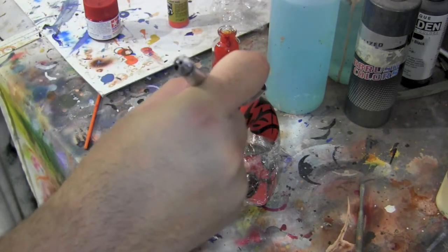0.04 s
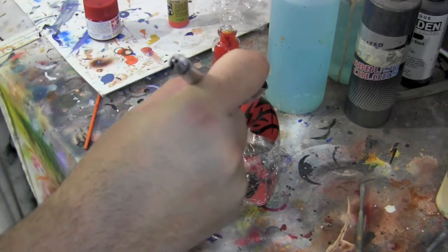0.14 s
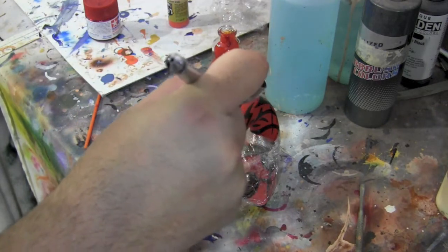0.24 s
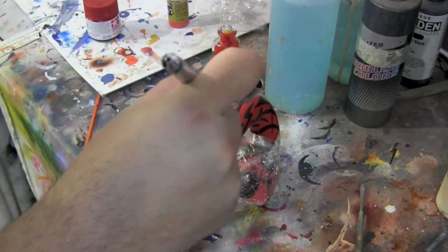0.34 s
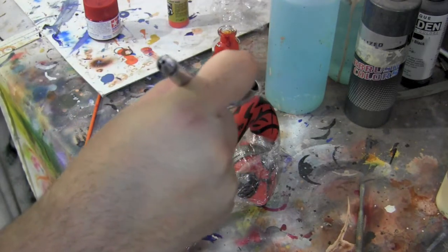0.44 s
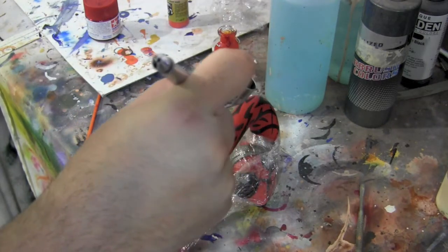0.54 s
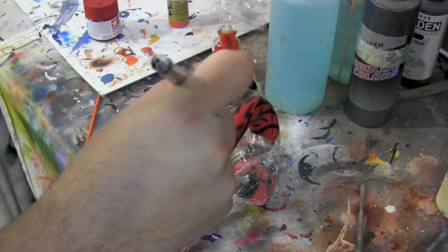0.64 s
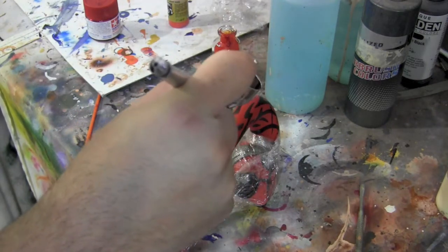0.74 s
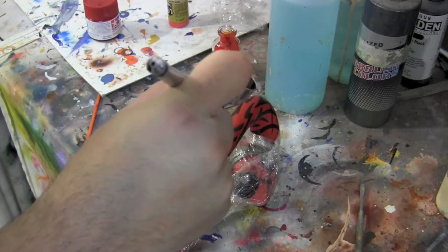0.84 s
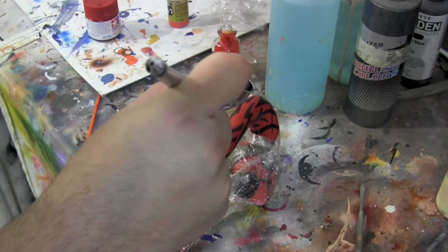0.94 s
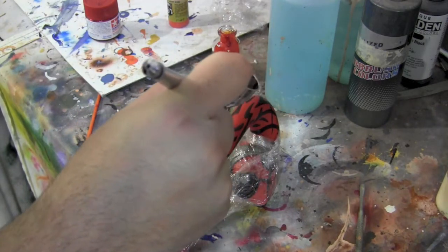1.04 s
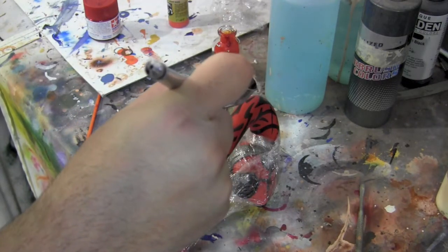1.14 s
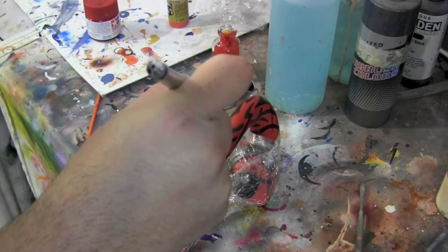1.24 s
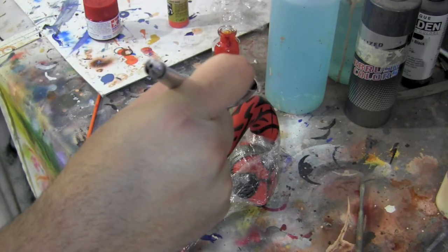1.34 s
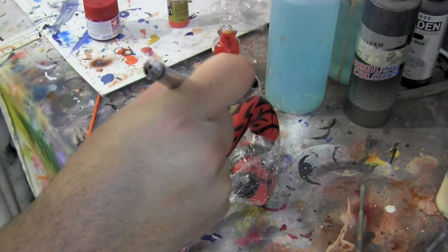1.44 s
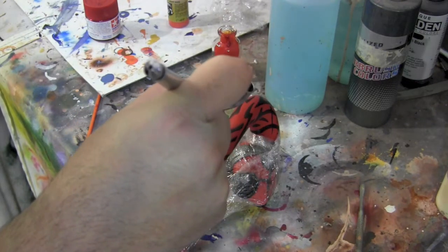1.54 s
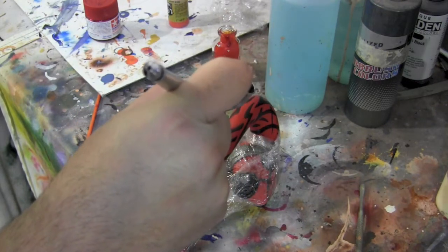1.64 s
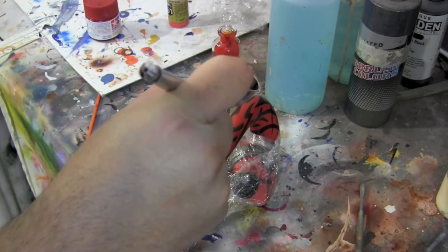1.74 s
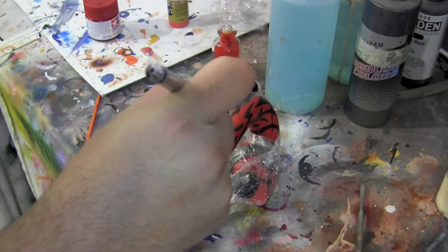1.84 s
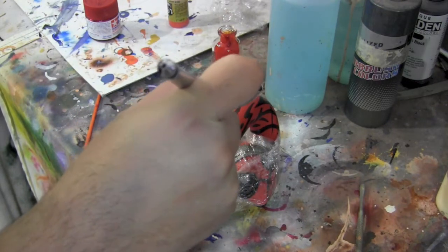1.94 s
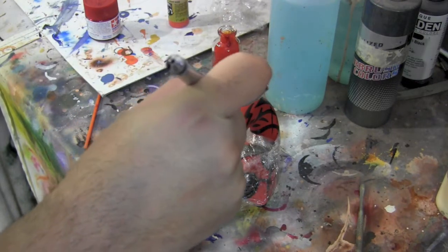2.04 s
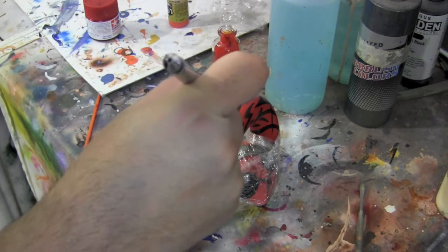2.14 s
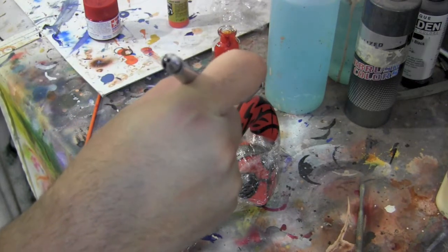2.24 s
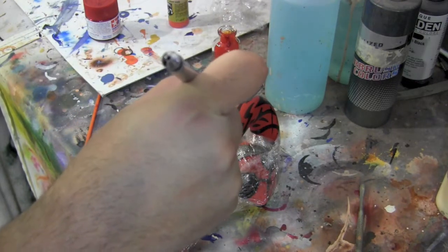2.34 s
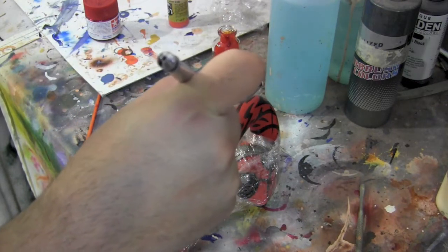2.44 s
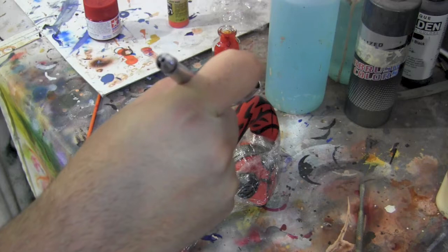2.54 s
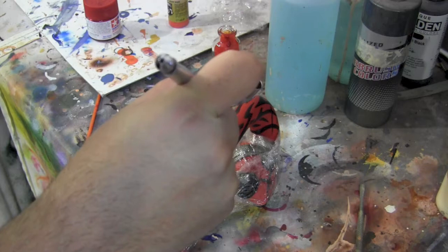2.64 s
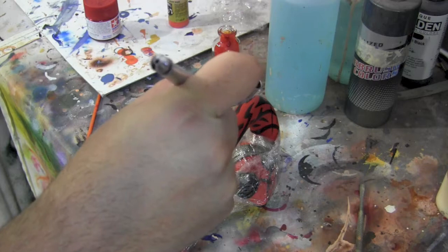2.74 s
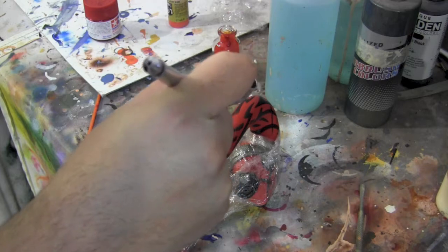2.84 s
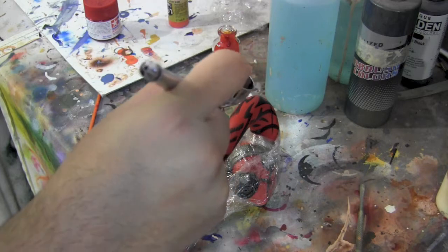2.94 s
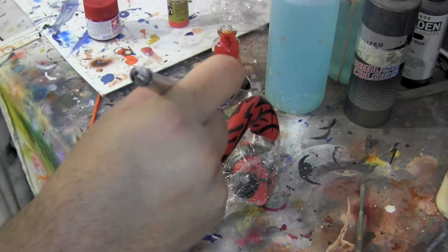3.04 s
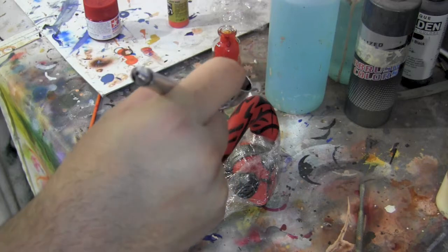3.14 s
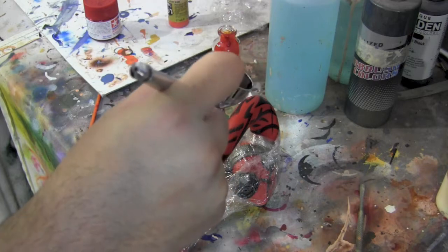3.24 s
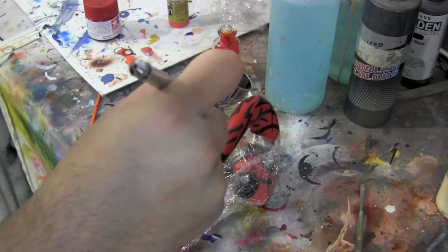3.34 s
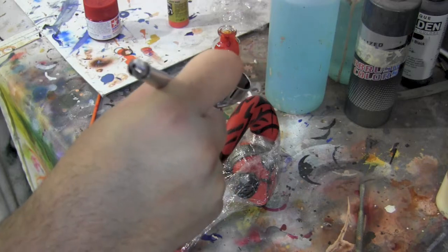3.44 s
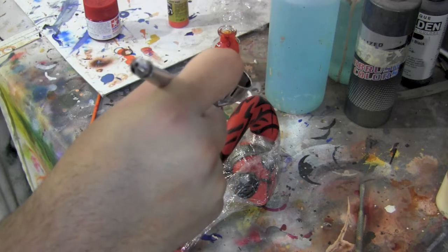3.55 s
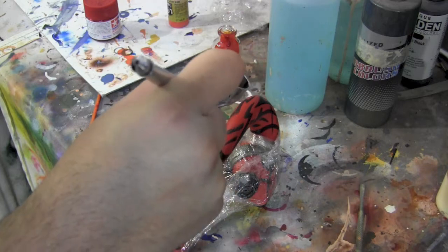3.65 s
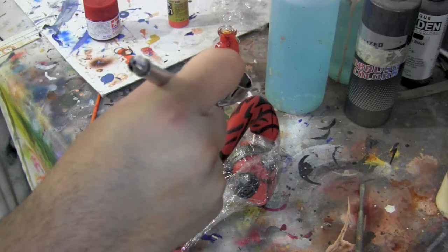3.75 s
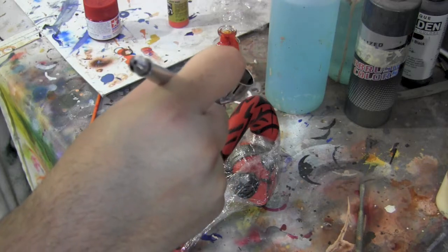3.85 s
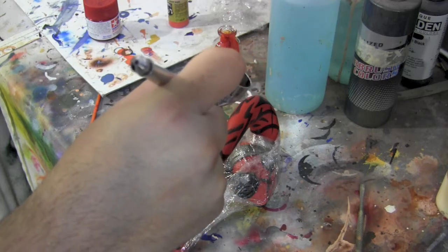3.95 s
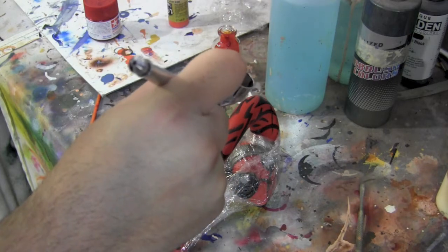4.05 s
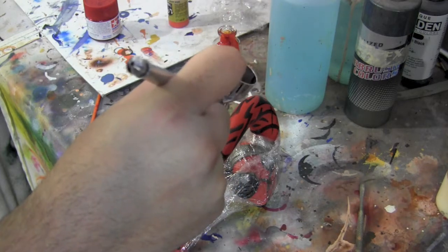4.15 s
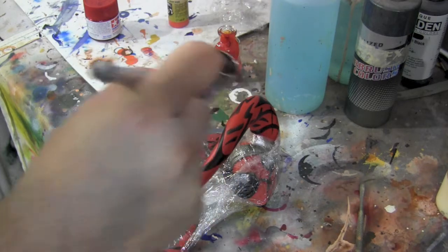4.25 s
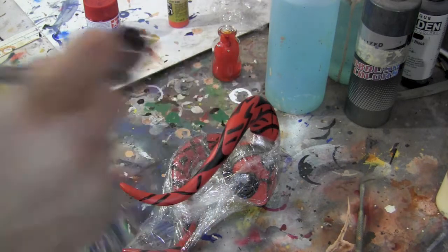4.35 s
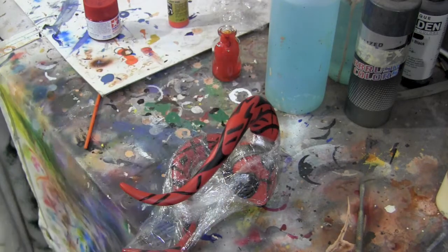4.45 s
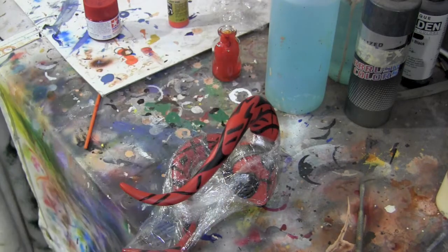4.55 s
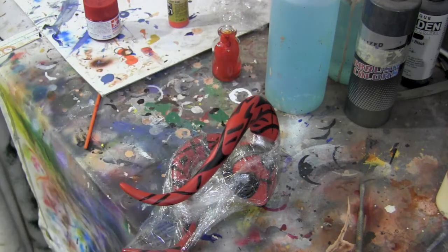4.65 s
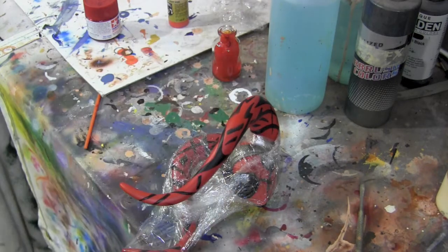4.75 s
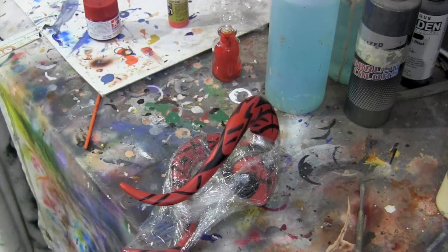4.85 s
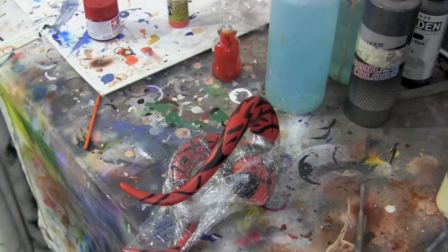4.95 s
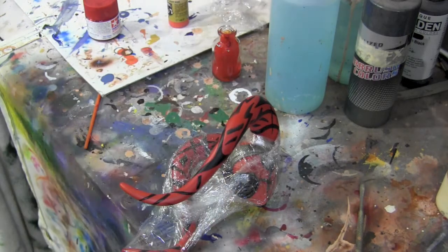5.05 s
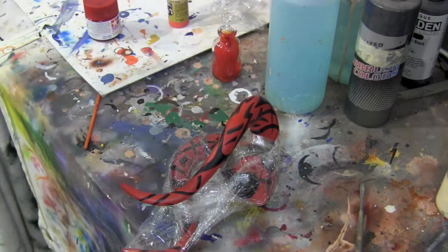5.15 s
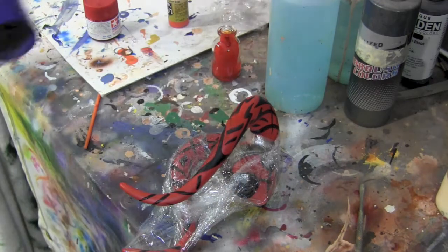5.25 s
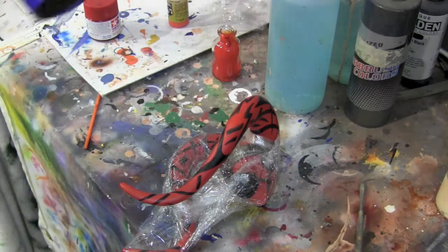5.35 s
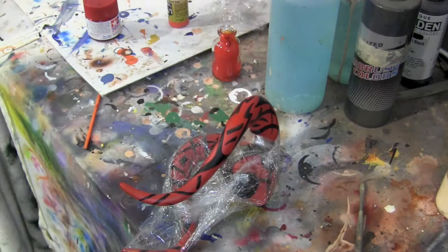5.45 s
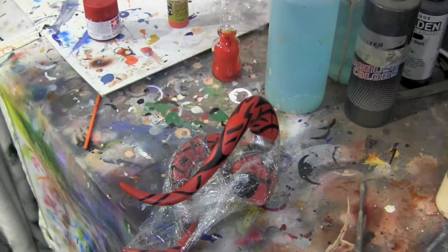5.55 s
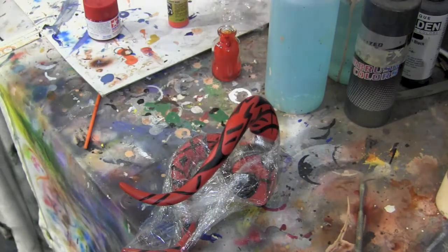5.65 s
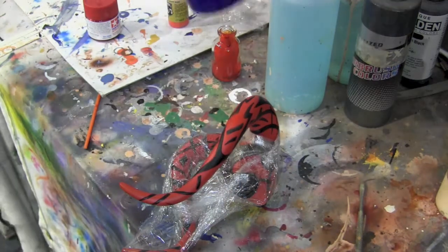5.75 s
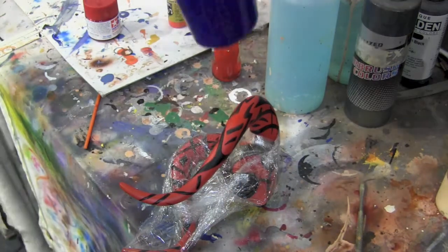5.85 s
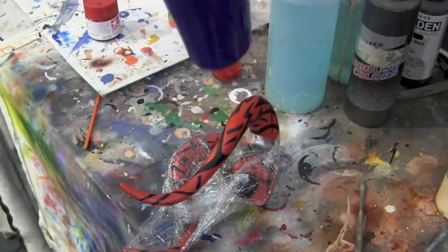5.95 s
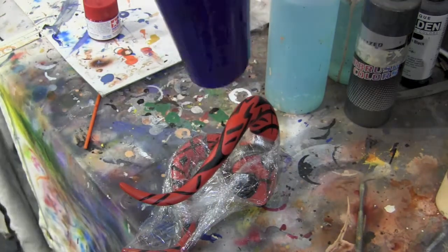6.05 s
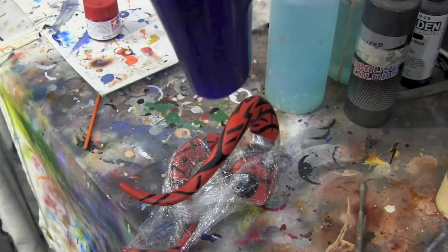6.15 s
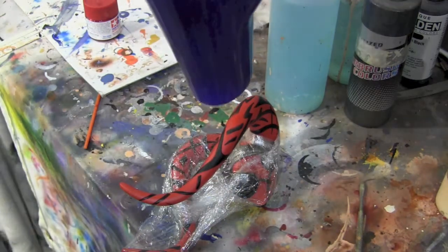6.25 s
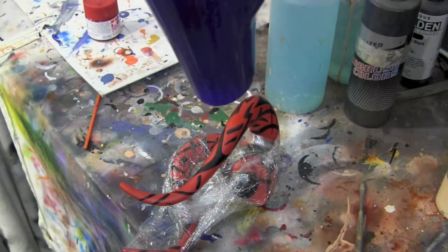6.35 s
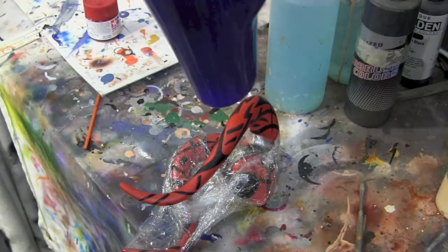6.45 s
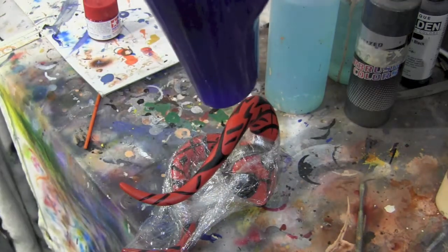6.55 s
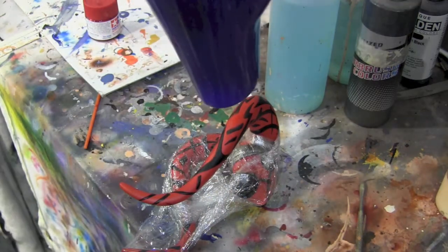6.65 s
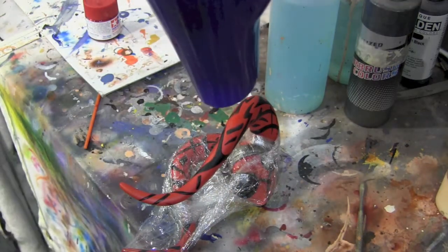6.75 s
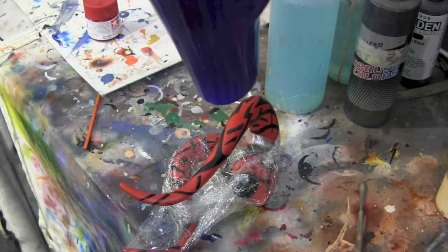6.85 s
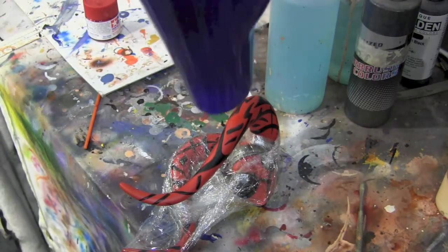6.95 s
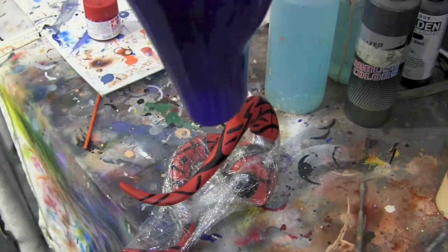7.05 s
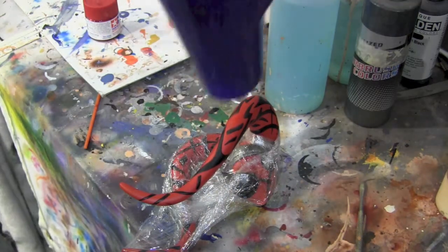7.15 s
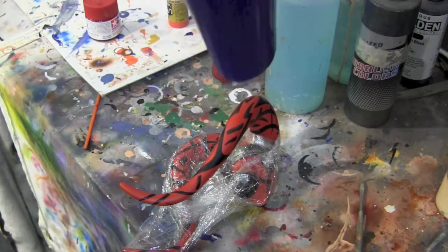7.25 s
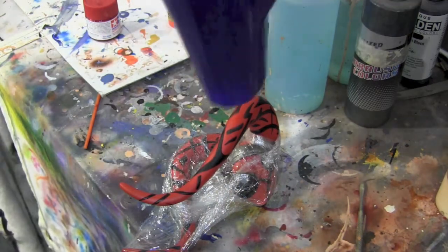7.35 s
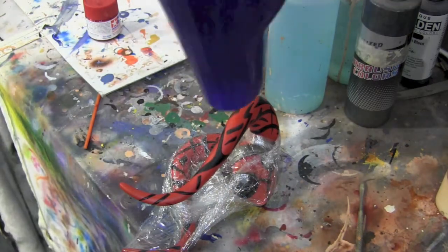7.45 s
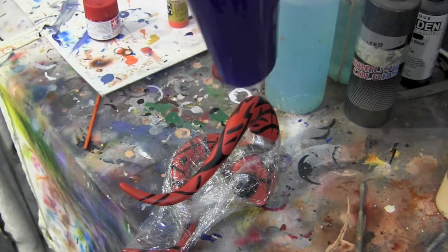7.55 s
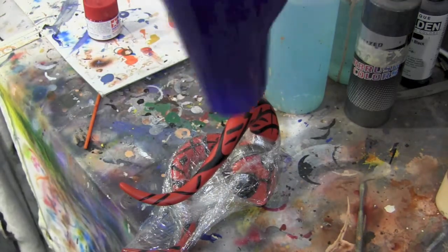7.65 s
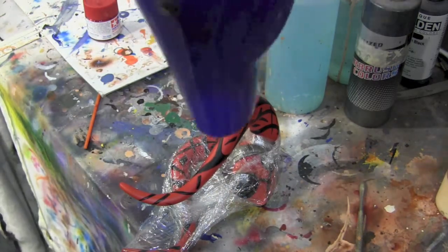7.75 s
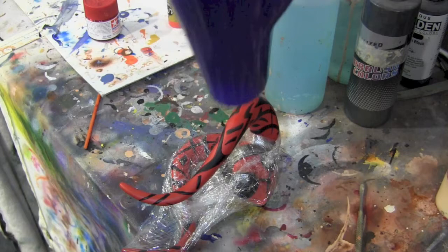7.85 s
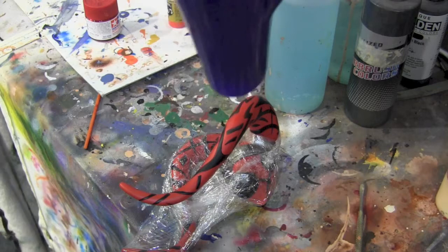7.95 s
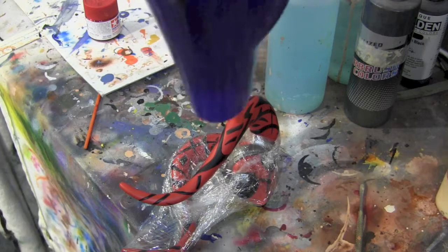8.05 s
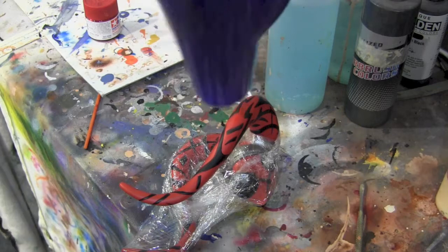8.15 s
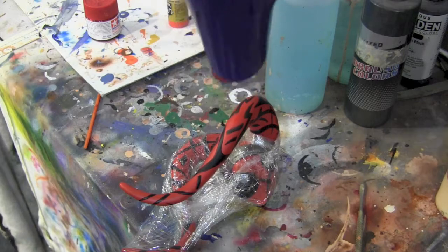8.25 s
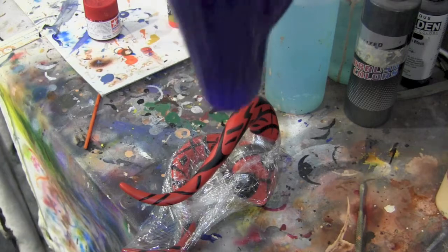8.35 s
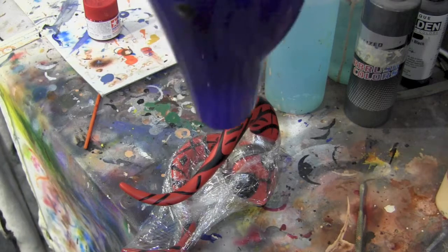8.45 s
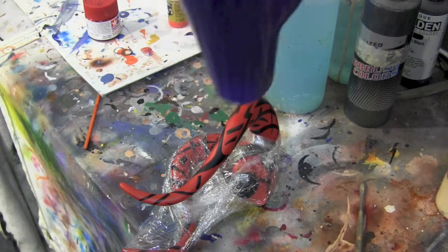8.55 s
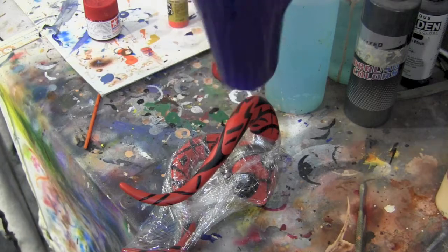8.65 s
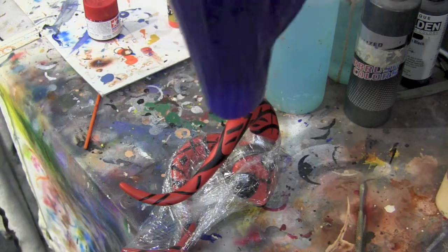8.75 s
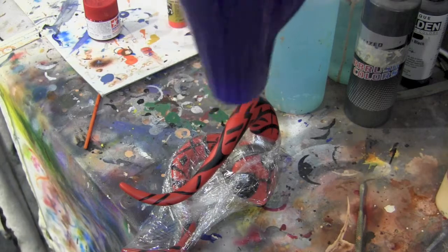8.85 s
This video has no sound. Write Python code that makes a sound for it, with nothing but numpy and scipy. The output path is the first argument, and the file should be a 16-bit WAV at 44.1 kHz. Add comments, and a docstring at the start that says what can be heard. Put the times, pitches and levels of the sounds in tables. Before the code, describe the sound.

In a small, dry, quiet workroom, an airbrush hisses in short separate spurts, about three per second, with faint whistles, a tiny squeak and a sharp metallic trigger click. It stops; soft knocks sound on the bench and a sleeve rustles. Then a switch clacks and a hair dryer spins up quickly, blowing loudly with a whining fan to the end. Close microphone, nearly centred.

```python
"""Airbrush spurts and a hair dryer

Twelve spurts of valved jet noise strike a small model; the nozzle half whistles and squeaks, modes of the
airbrush ring as its trigger snaps, and modes of the bench ring under knocks. A sleeve rustles, a switch knocks
its shell, and a hair dryer spins up: fan tones locked to the shaft whine over rushing air that slowly comes closer.
A small, dry, faintly humming room adds short reflections; left and right are nearly alike."""
import sys
import numpy as np
from scipy import signal
from scipy.fft import rfft, irfft, next_fast_len
from scipy.io import wavfile
from scipy.ndimage import uniform_filter1d

SR = 44100
rng = np.random.default_rng(int(sys.argv[2]) if len(sys.argv) > 2 else 0)


def wrap_up_sound(samples):
    """Save the sound to the file named by the first command line argument, as 16-bit audio."""
    columns = np.atleast_2d(samples).T
    # keep every value between -1 and 1, then stretch to whole-number steps
    tamed = np.clip(columns, -1, 1)
    steps = np.round(tamed * 32767).astype(np.int16)
    wavfile.write(sys.argv[1], SR, steps)


N = 392049
TIME = np.arange(N) / SR


def undb(db):
    """Logarithmic level: decibels to amplitude gain."""
    return 10 ** (np.asarray(db) / 20)


def unit(x):
    """Normalisation: scale to rms 1."""
    return x / np.sqrt(np.mean(x ** 2))


def boost_db(hz, peaks):
    """Resonance: gain at the given frequencies of peaks (centre_hz, width_hz, boost_db)."""
    return sum(db / (1 + (2 * (hz - centre) / width) ** 2) for centre, width, db in peaks)


def noise(points, peaks=(), size=N):
    """Spectral shaping: white noise filtered to a (hz, db) curve plus resonances, then set to rms 1."""
    n = next_fast_len(size, real=True)
    # the 1 Hz offset avoids log(0)
    f = np.arange(n // 2 + 1) * SR / n + 1
    hz, db = np.transpose(points)
    shape_db = np.interp(np.log(f), np.log(hz), db) + boost_db(f, peaks)
    spectrum = rfft(rng.standard_normal(n)) * undb(shape_db)
    return unit(irfft(spectrum, n)[:size])


def walk(rate):
    """Slow random modulation: levels held 1 / rate seconds, smoothed twice, rms 1."""
    hold = max(int(SR / rate), 1)
    steps = np.repeat(rng.standard_normal(N // hold + 1), hold)
    return unit(uniform_filter1d(uniform_filter1d(steps, hold), hold)[:N])


def band(x, low_hz, high_hz):
    """Band-pass filtering: keep the range between two edges."""
    edges = [low_hz, min(high_hz, .45 * SR)]
    return signal.sosfilt(signal.butter(2, edges, "bandpass", fs=SR, output="sos"), x)


def burst(decay_s):
    """Impulsive excitation: half a second of exponentially fading noise."""
    return rng.standard_normal(SR // 2) * np.exp(-TIME[:SR // 2] / decay_s)


def ring(modes, pitch=1):
    """Modal decay: half a second of damped sines (hz, db, t60_s) after a blow, peak 1."""
    t = TIME[:SR // 2]
    y = np.zeros(len(t))
    for hz, db, t60 in modes:
        y += undb(db) * np.sin(2 * np.pi * hz * pitch * t) * np.exp(-np.log(1000) * t / t60)
    return y / np.abs(y).max()


def unsteady_phase(hz, width_hz):
    """Phase diffusion: random jitter smears a tone over the given width."""
    jitter = np.sqrt(width_hz * SR / (2 * np.pi)) * rng.standard_normal(len(hz))
    return 2 * np.pi * np.cumsum(hz + jitter) / SR


def add(out, s, sound):
    """Superposition: mix a short sound in at time s."""
    i = max(int(s * SR), 0)
    out[i:i + len(sound)] += sound[:N - i]


# room noise spectrum: hz, relative level_db
AMBIENCE_SPECTRUM = [(18, -52), (30, -29), (48, -23), (97, -15), (129, -10.5), (171, -7.5), (288, -8.5),
                     (394, -8.5), (2130, -14.5), (2630, -14), (12200, -28.5), (15000, -34)]
AMBIENCE_DB = -62.5
# wavering room hum: mean pitch_hz, mean level_db
HUM_TONES = [(59, -87.5), (124, -73.5)]


def ambience():
    """Stationary background: shaped noise with a slight flicker, and low tones wavering in pitch and level."""
    hum = np.zeros(N)
    for hz, db in HUM_TONES:
        phase = 2 * np.pi * np.cumsum(hz + 2 * walk(24)) / SR
        hum += undb(db + 2 * walk(4.7)) * np.sin(phase)
    flicker_db = .7 * walk(23)
    return undb(AMBIENCE_DB + flicker_db) * noise(AMBIENCE_SPECTRUM) + hum


# levels at time 0: rush of the jet on the model, boost of its hollow ring, nozzle hiss, thin top sizzle
RUSH_DB, HOLLOW_DB, HISS_DB, SIZZLE_DB = -36.5, 12, -43, -49
# the aim creeps along the model: the rush sinks and fades, its ring weakens, hiss and sizzle grow
RUSH_PITCH, RUSH_OCTAVES_PER_S = 1.067, -0.051
RUSH_DB_PER_S, HOLLOW_DB_PER_S, HISS_DB_PER_S, SIZZLE_DB_PER_S = -0.85, -2.4, 0.18, 1
# dB gained for each dB of air flow
RUSH_GROWTH, SIZZLE_GROWTH = 0.35, 1.9
# valve of the airbrush: start_s, end_s, flow_db
SPURTS = [(-.05, 0.064, 2), (.296, 0.43, 0), (0.725, 0.844, 0.2), (1.052, 1.174, 0.8), (1.403, 1.519, 0),
          (1.733, 1.855, -1), (2.156, 2.284, 0.5), (2.435, 2.613, -.3), (2.822, 2.972, 1.5),
          (3.455, 3.595, 0.5), (3.735, 3.918, 2), (4.066, 4.219, 2)]
# jet striking the model: hz before the pitch drift, relative level_db
RUSH_SPECTRUM = [(100, -36), (220, -18.5), (350, -6.5), (550, -5.5), (760, 3), (1100, 0.5), (1500, -9),
                 (2050, -10), (2900, -11), (4500, -23.5), (9000, -41)]
# jet leaving the nozzle: hz, relative level_db
HISS_SPECTRUM = [(800, -23), (2500, -11), (3700, 3.5), (5200, 1.5), (7000, 3), (8000, 3.5), (10500, 1.5),
                 (11600, -2), (13000, 7), (14000, -5), (14700, -22), (15500, -40)]
# thin top of the jet: hz, relative level_db
SIZZLE_SPECTRUM = [(5000, -11), (7800, -53), (8600, 7), (9500, 1), (10500, 5), (11800, -0.5), (13000, -3),
                   (14000, -8), (15000, -35)]
# hollow ring of the jet against the model: centre_hz, width_hz
HOLLOW_RING = (2070, 970)


def airbrush(open_s=0.0059, shut_s=0.007, flutter_db=-0.1, spit_db=1.07):
    """Jet noise: a valve gates nozzle hiss and an impinging rush whose colour drifts as the aim moves."""
    rush, hiss = np.zeros(N), np.zeros(N)
    size = SR // 3
    for start, end, flow_db in SPURTS:
        t = max(start - .03, 0) + TIME[:size]
        opening = (1 + np.tanh((t - start) / open_s - .5)) / 2
        valve = opening * np.exp(-np.maximum(t - end, 0) / shut_s)
        pitch = RUSH_PITCH * 2 ** (RUSH_OCTAVES_PER_S * start)
        rush_db = RUSH_DB + RUSH_DB_PER_S * start + RUSH_GROWTH * flow_db
        hiss_db = HISS_DB + HISS_DB_PER_S * start + flow_db
        sizzle_db = SIZZLE_DB + SIZZLE_DB_PER_S * start + SIZZLE_GROWTH * flow_db
        spectrum = [(hz * pitch, db) for hz, db in RUSH_SPECTRUM]
        hollow = (*HOLLOW_RING, HOLLOW_DB + HOLLOW_DB_PER_S * start)
        impact = noise(spectrum, [hollow], size=size)
        jet = undb(hiss_db) * noise(HISS_SPECTRUM, size=size)
        jet += undb(sizzle_db) * noise(SIZZLE_SPECTRUM, size=size)
        add(rush, t[0], valve * undb(rush_db) * impact)
        add(hiss, t[0], valve * jet)
    return rush * undb(flutter_db * walk(70)) + hiss * undb(spit_db * walk(200))


# half-formed nozzle whistles: start_s, length_s, pitch_hz, level_db
WHISTLES = [(0.018, .055, 7300, -45), (0.348, .1, 6930, -45), (0.771, 0.084, 7050, -43.5),
            (1.066, 0.06, 7160, -43.5), (2.502, .069, 6270, -43.5)]


def whistles(width_hz=560):
    """Incomplete jet locking: brief tones on an unsteady pitch."""
    out = np.zeros(N)
    for s, length, hz, db in WHISTLES:
        n = int(length * SR)
        tone = np.sqrt(2) * np.sin(unsteady_phase(np.full(n, hz), width_hz))
        add(out, s, undb(db) * signal.windows.tukey(n, .5) * tone)
    return out


# nozzle squeaks: start_s, settled pitch_hz, level_db
SQUEAKS = [(2.825, 4610, -29), (2.852, 2900, -32)]


def squeaks(attack_s=0.0035, decay_s=0.01, overshoot_hz=650, settle_s=0.0034, width_hz=80, octave_db=-8):
    """Pitch relaxation: a nozzle tone with its octave starts sharp, settles and fades."""
    out, t = np.zeros(N), TIME[:SR // 10]
    for s, hz, db in SQUEAKS:
        phase = unsteady_phase(hz + overshoot_hz * np.exp(-t / settle_s), width_hz)
        envelope = np.minimum(t / attack_s, 1) * np.exp(-np.maximum(t - attack_s, 0) / decay_s)
        tone = np.sin(phase) + undb(octave_db) * np.sin(2 * phase)
        add(out, s, undb(db) * envelope * tone)
    return out


# trigger snapping back: start_s, level_db, pitch_factor, dull clack_db relative to the ring
CLICKS = [(3.0073, -9.5, 1.0, -7.5), (4.3098, -23.5, 0.9, 1.5)]
# modes of the airbrush body: hz at pitch factor 1, relative level_db, t60_s
METAL_MODES = [(2280, -7, .02), (2620, -13, .012), (3270, 0, .018), (3520, -5, .016), (3900, -6, .012),
               (5400, -12, .007), (8550, -9, .005), (8560, -41, .3), (10000, -9, .005), (11800, -5, .005),
               (12730, -8, .008)]


def trigger(snap_db=-14):
    """Impact excitation: the sprung trigger hits its stop with a hard snap, a dense clack and a metal ring."""
    out = np.zeros(N)
    for s, db, pitch, clack_db in CLICKS:
        clack = undb(clack_db) * band(burst(decay_s=0.0038), low_hz=2030, high_hz=4250)
        snap = undb(snap_db) * burst(decay_s=0.0039)
        add(out, s, undb(db) * (ring(METAL_MODES, pitch) + clack + snap))
    # so small a body radiates almost nothing below its lowest mode
    return signal.sosfilt(signal.butter(8, 1950, "highpass", fs=SR, output="sos"), out)


# rebounds: first gap, ratio of one gap to the last, their level against the knock, growth of contact time
BOUNCE_S, BOUNCE_RATIO, BOUNCE_DB, BOUNCE_SOFTENING = .018, 0.5, -14.5, 1.4


def bounces(s, db, contact_ms, count=3):
    """Inelastic rebound: a knock and ever quicker, weaker repeats, the later ones with longer contact."""
    blows = [(s, db, contact_ms)]
    times = s + np.cumsum(BOUNCE_S * BOUNCE_RATIO ** np.arange(count))
    for k, at in enumerate(times):
        blows.append((at, db + BOUNCE_DB, contact_ms * BOUNCE_SOFTENING ** k))
    return blows


# knocks on the bench: start_s, level_db before filtering, contact_ms
KNOCKS = [(4.4535, -42, .06), (4.555, -34.5, .22), (4.603, -38, .08), (4.9082, -23, .36),
          (4.9935, -27, 1.3)]
# modes of the bench top: hz, relative level_db, t60_s
BENCH_MODES = [(179, 2, 0.048), (248, 0.5, 0.06), (355, -2, 0.042), (440, -4, 0.049), (577, -1, 0.035),
               (800, -6, 0.017), (1110, -22, 0.012), (1570, 1, 0.013), (2200, 3, 0.0089), (3370, -8, .01)]


def knocks(crack_db=-4, rattle_db=-8):
    """Modal excitation with finite contact time: blows ring the bench top and rattle the things on it."""
    out = np.zeros(N)
    for s, db, contact_ms in [blow for knock in KNOCKS for blow in bounces(*knock)]:
        rattle = undb(rattle_db) * band(burst(decay_s=0.021), low_hz=200, high_hz=1200)
        blow = ring(BENCH_MODES) + undb(crack_db) * burst(decay_s=0.0021) + rattle
        # a longer contact pushes more softly and dulls the knock
        keep = np.exp(-2 * np.pi * 1000 / (contact_ms * SR))
        add(out, s, undb(db) * signal.lfilter([1 - keep], [1, -keep], blow))
    # the board radiates little below its lowest mode
    return band(band(out, low_hz=145, high_hz=4200), low_hz=145, high_hz=9000)


# the arm moving over the bench: centre_s, half_length_s, level_db
RUSTLES = [(4.506, 0.041, -56), (4.694, 0.11, -60.5), (5.547, 0.4, -64), (5.86, 0.053, -56)]


def sleeve(grain_db=2):
    """Friction noise: grainy soft rustles swell and fade as the arm draws back and reaches for the dryer."""
    swell = sum(undb(db) * np.exp(-((TIME - s) / length) ** 2) for s, length, db in RUSTLES)
    cloth = [(100, -5), (250, 0.5), (900, 2), (1500, -3), (2400, -5.0), (6000, -13), (14000, -40)]
    return swell * undb(grain_db * walk(60)) * noise(cloth)


# rocker switch of the dryer: start_s, level_db, pitch_factor
SWITCH_KNOCKS = [(5.833, -51, 0.78), (5.862, -25.5, 0.99), (5.899, -28, .86), (5.926, -25, 0.91)]
# modes of the dryer shell: hz at pitch factor 1, relative level_db, t60_s
SHELL_MODES = [(650, -10, 0.055), (777, -1, 0.13), (900, -16, .04), (1195, -21, .04), (3420, -18, 0.032)]


def switch():
    """Modal excitation: the rocker switch knocks the dryer's hollow shell."""
    out = np.zeros(N)
    for s, db, pitch in SWITCH_KNOCKS:
        add(out, s, undb(db) * ring(SHELL_MODES, pitch))
    return band(out, low_hz=380, high_hz=6000)


# share of full speed at which the motor stops straining
STRAIN_ENDS = .6
# motor chatter spectrum: hz, relative level_db
CHATTER_SPECTRUM = [(90, -40), (250, -26), (750, 5.5), (1200, -4), (1800, -13), (4000, -13.5), (12000, -49)]


def starting_motor(speed, turns, growl_db=-30, chatter_db=-21, chatter_turns=0.33, release=0.013,
                   growl_power=3.6, growl_rough=0.44):
    """Starting torque: heavy current makes the five-pole armature growl and the shaft chatter once a turn."""
    # the strain grows with speed, then lets go when the motor runs free
    strain = speed / STRAIN_ENDS * (1 - np.tanh((speed - STRAIN_ENDS) / release)) / 2
    growl = strain ** growl_power * (1 + growl_rough * walk(90))
    growl *= np.sin(2 * np.pi * 5 * turns)
    chatter = strain * np.exp(-(turns % 1) / chatter_turns) * noise(CHATTER_SPECTRUM)
    return band(undb(growl_db) * growl + undb(chatter_db) * chatter, low_hz=230, high_hz=12100)


MOTOR_ON_S, SPIN_UP_S = 5.89, .235
SHAFT_HZ = 172.7  # mean shaft rate at full speed
# tones of the seven-bladed fan: multiple of the shaft rate (rounded for pitch, as given for resonance),
# level_db at full speed before resonance, extra level_db at standstill
FAN_ORDERS = [(1, -50, -50), (2, -44.5, -19), (4, -40.5, -5), (5, -40, 20), (5.95, -43, 0), (7, -27.5, 2),
              (9, -51, 2), (10, -43, 5), (14.5, -35.5, 3), (17, -61, -3), (21, -49, -3), (25, -41.5, -15),
              (28.1, -47, -2), (35.2, -48, 0)]
# air resonances of the dryer barrel: centre_hz, width_hz, boost_db
BARREL = [(2084, 460, 11), (2887, 170, 5), (3600, 710, 2.5), (4900, 170, 3.5), (5820, 260, 2.5),
          (6630, 270, 3.5), (13400, 900, 5.5)]
# shell resonance the fan tones glide through: centre_hz, width_hz, boost_db
SHELL_BOOST = [(780, 53, 6)]


def fan_tones(speed, turns, flutter=0.16):
    """Rotor harmonics: blade eddies shake each tone, which swells gliding through barrel and shell resonances."""
    out = np.zeros(N)
    for multiple, db, slow_db in FAN_ORDERS:
        angle = 2 * np.pi * round(multiple) * turns
        tone = (1 + flutter * walk(60)) * np.cos(angle) + flutter * walk(60) * np.sin(angle)
        resonance_db = boost_db(multiple * SHAFT_HZ * speed, BARREL + SHELL_BOOST)
        out += np.sqrt(2) * tone * undb(db + slow_db * (1 - speed) + resonance_db)
    # slowly turning blades hardly sing
    return out * np.clip(speed / 0.51, 0, 1) ** 2


# at full speed: air through the barrel, rush of air deflected by the model; then how each changes at standstill
AIR_DB, DEFLECTED_DB = -20.5, -27.5
AIR_STANDSTILL_DB, DEFLECTED_STANDSTILL_DB = -27, -16.5
# the hand brings the nozzle slowly closer and waves it over the model
APPROACH_DB_PER_S, WAVE_RATE_HZ, WAVE_DB = 0.65, 3.25, 0.75
# the pulsing mains supply ripples the motor's speed by this share
MAINS_HZ, MAINS_RIPPLE = 60, 0.01
# air through the barrel: hz, relative level_db before resonance
BLOW_SPECTRUM = [(40, -60), (100, -35), (170, -19), (350, -8.5), (440, -10.5), (620, 2), (1100, -10),
                 (1500, -10.5), (2600, -13), (3600, -12), (6000, -16), (9700, -26.5), (13600, -32),
                 (14450, -50), (14900, -66)]
# air deflected by the model: hz, relative level_db
TURBULENCE_SPECTRUM = [(60, -54), (170, -16.5), (330, -17), (440, -20), (500, 2.5), (630, 1), (760, 3.5),
                       (950, -10), (1400, -2), (3000, -42)]


def hair_dryer(tone_db=-0.86, speed_wander=0.00153, eddy_db=0.9, switch_on_s=0.033, treble_power=1.5, mains_db=-70):
    """Aerodynamic noise: a motor nears full speed exponentially; its fan's tones and air grow with speed."""
    age = np.maximum(TIME - MOTOR_ON_S, 0)
    running = np.minimum(age / switch_on_s, 1)
    speed = 1 - np.exp(-age / SPIN_UP_S)
    near = running * undb(AIR_STANDSTILL_DB * (1 - speed) + APPROACH_DB_PER_S * age)
    mains = np.sin(2 * np.pi * MAINS_HZ * TIME)
    shaft_hz = SHAFT_HZ * speed * (1 + speed_wander * walk(6) + MAINS_RIPPLE * mains)
    turns = np.cumsum(shaft_hz) / SR
    # slow air is dull: the treble grows with the speed of the fan
    air = noise(BLOW_SPECTRUM, BARREL)
    dull = signal.sosfilt(signal.butter(1, 3000, fs=SR, output="sos"), air)
    air = undb(AIR_DB) * near * (dull + speed ** treble_power * (air - dull))
    deflected_db = DEFLECTED_DB + DEFLECTED_STANDSTILL_DB * (1 - speed)
    deflected_db += WAVE_DB * walk(WAVE_RATE_HZ) + eddy_db * walk(90)
    rush = running * undb(deflected_db) * noise(TURBULENCE_SPECTRUM)
    hum = speed * undb(mains_db) * mains
    whine = undb(tone_db) * near * fan_tones(speed, turns)
    return air + rush + hum + whine + starting_motor(speed, turns)


def bench_echo(x, delay_ms=1.295, sway_ms=0.11, echo_db=-14, low_hz=2700):
    """Comb interference: the bench returns a band-limited copy whose delay sways with the hand."""
    delay_s = (delay_ms + sway_ms * walk(2.5)) / 1000
    return x + undb(echo_db) * np.interp(TIME - delay_s, TIME, band(x, low_hz=low_hz, high_hz=16000))


def room(x, wet_db, low_t60=0.23, high_t60=0.19, treble_db=-3):
    """Reverberation: dense reflections of a small workroom; the treble is weaker and dies first."""
    t = TIME[:SR // 2]
    scatter = rng.standard_normal(len(t)) * np.clip((t - .004) / 0.0097, 0, 1)
    low = signal.sosfilt(signal.butter(1, 3000, fs=SR, output="sos"), scatter)
    fade_low, fade_high = (np.exp(-np.log(1000) * t / t60) for t60 in (low_t60, high_t60))
    tail = low * fade_low + undb(treble_db) * (scatter - low) * fade_high
    return undb(wet_db) * signal.fftconvolve(x, tail / np.linalg.norm(scatter * fade_low))[:N]


def port_difference(x, db, low_hz):
    """Scattering: short waves spread around the microphone body and reach its two ports unequally."""
    scatter = burst(decay_s=.003)[:SR // 50]
    treble = band(band(x, low_hz, high_hz=17800), low_hz, high_hz=17800)
    return undb(db) * signal.oaconvolve(treble, scatter / np.linalg.norm(scatter))[:N]


def scene():
    """Superposition: all sources in the room; left and right differ by scattered treble and faint room sound."""
    spray = bench_echo(airbrush(), delay_ms=0.76, sway_ms=0.128, echo_db=-12, low_hz=900)
    tools = spray + whistles() + squeaks() + trigger() + knocks() + switch()
    dryer = bench_echo(hair_dryer())
    mid = tools + dryer + sleeve() + ambience()
    mid += room(tools, wet_db=-10.5) + room(dryer, wet_db=-16.0)
    side = port_difference(tools, db=-10, low_hz=7750)
    side += port_difference(dryer, db=-36, low_hz=4000)
    side += room(band(tools + dryer, low_hz=60, high_hz=980), wet_db=-23.5)
    side += undb(-64) * noise([(50, -18), (130, 0), (400, 3.5), (2500, -15.5), (14000, -22.5)])
    return np.array([mid + side, mid - side])


TOP_HZ = 15300


def record(dry):
    """Band limitation: a steep elliptic low-pass cuts the top."""
    return signal.sosfilt(signal.ellip(8, .2, 70, TOP_HZ, fs=SR, output="sos"), dry)


dry = scene()
out = record(dry)
wrap_up_sound(out)
```